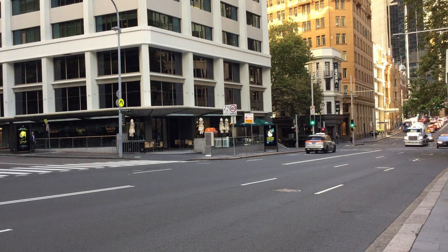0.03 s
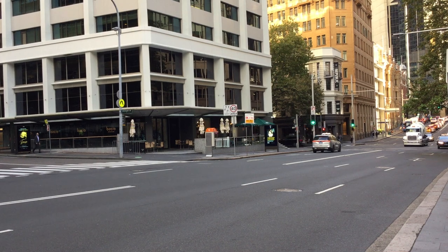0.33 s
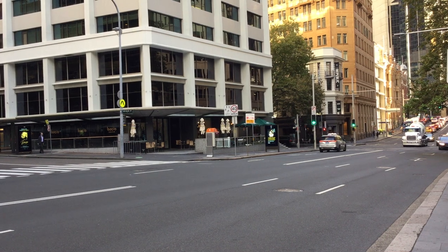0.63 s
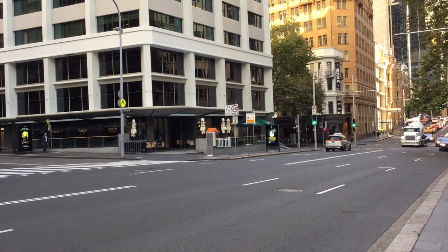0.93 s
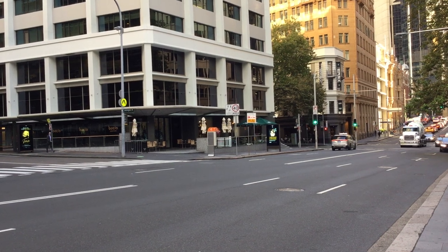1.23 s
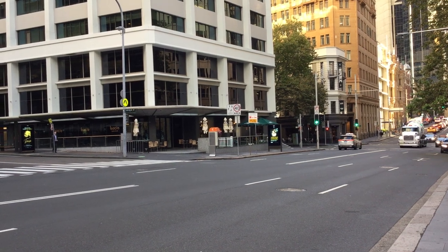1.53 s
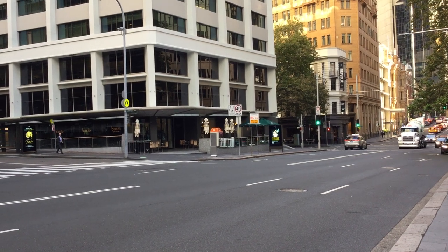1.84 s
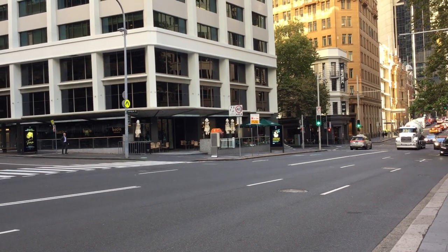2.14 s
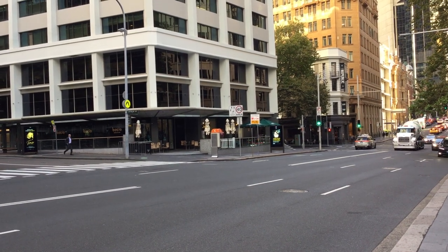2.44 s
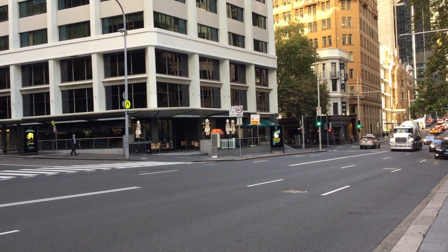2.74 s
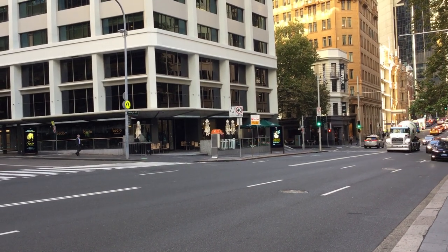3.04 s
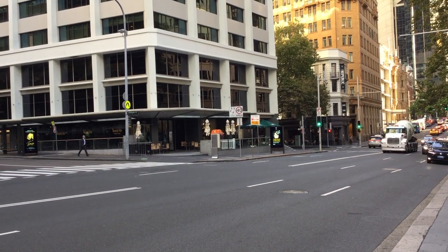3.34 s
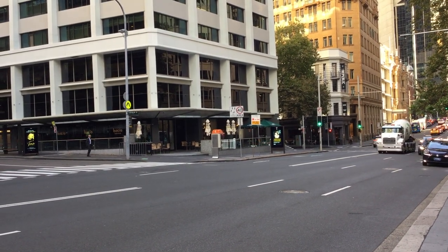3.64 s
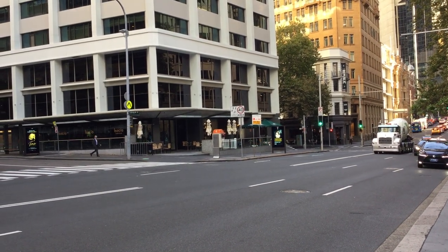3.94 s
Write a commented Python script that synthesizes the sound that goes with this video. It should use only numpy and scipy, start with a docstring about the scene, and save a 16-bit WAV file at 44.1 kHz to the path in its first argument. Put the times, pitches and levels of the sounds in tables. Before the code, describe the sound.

Heard from the roadside between tall buildings, a diesel truck revs, drops in pitch at a gear change, then builds again with brief squeals. One car speeds away and another rolls closer over constant engine rumble and tyre noise.

```python
"""A diesel truck at a city junction

A truck pulls towards a wide junction, changes up a gear and pulls again. Each firing of its
cylinders puffs down the exhaust and rattles the engine, while its turbocharger whistles.
One car speeds away and another rolls closer. Tall buildings echo the truck's exhaust,
blurring it into the steady rumble of far engines and the roar of tyres."""
import sys
import numpy as np
from scipy import signal
from scipy.fft import rfft, irfft
from scipy.io import wavfile

SR = 44100
rng = np.random.default_rng(int(sys.argv[2]) if len(sys.argv) > 2 else 0)


def transcribe(signal):
    """Save signal, clipped to [-1, 1], as a 16-bit WAV file at the path in sys.argv[1]."""
    frames = np.atleast_2d(signal).T
    limited = np.clip(frames, -1, 1)
    pcm = np.round(limited * 32767).astype(np.int16)
    wavfile.write(sys.argv[1], SR, pcm)


N = 176400


def truck():
    """Six slightly unequal cylinders fire in turn and set the beat for every part of the engine."""
    # Engine speed. Each row: time in seconds, firings per second.
    speed = [(0, 99.5), (.45, 99.8), (.8, 101.5), (1.0, 106.5), (1.22, 104.6), (1.5, 103), (1.75, 84),
             (2.2, 86.8), (2.55, 90.9), (3.05, 95.3), (3.5, 100), (3.8, 97.3), (4, 96)]
    # How hard the throttle drives the exhaust. Each row: time in seconds, gain in dB.
    throttle = [(0, -5.5), (.6, -1), (1.1, 1.5), (1.45, 0), (1.7, 2), (2.0, -1), (2.6, -0.5), (3.3, 1.5),
                (4, -3)]
    # How openly the engine bay is heard. Each row: time in seconds, gain in dB.
    openness = [(0, 6), (.6, -4.5), (1.1, -3.5), (1.6, -1), (1.9, 1.5), (2.35, 6), (2.8, 4.5), (3.05, 5.5),
                (3.3, 4.5), (3.5, 7.5), (3.85, 6.5), (4, 0.5)]
    cylinder_spread_db, firing_scatter_db = 2.5, 5.5
    hz = curve(speed) * (1 + 0.0035 * walk(9.1))
    count = np.cumsum(hz) / SR
    firing, phase = count.astype(int), count % 1  # which firing, and how far through it
    cylinders = level(signal.detrend(rng.standard_normal(6), type="constant"), 0)
    scatter = rng.standard_normal(N)[firing]
    strength = undb(cylinder_spread_db * cylinders[firing % 6] + firing_scatter_db * scatter)
    puffs = np.diff(firing, prepend=0) * strength
    load, bay = undb(curve(throttle)), undb(curve(openness))
    pipe = exhaust(puffs, load) + pipe_boom(hz, load)
    return pipe + block_clatter(strength, phase, bay) + injectors(phase, bay) + gears(hz)


def exhaust(puffs, load):
    """The pipe turns the puffs into a deep throb that echoes in the street."""
    # The pipe's tone. Each row: frequency in Hz, gain in dB.
    pipe = [(30, -41), (70, -61), (105, -5), (150, -1), (210, 2.5), (290, 6), (350, -4), (450, -11.5),
            (700, -12), (1500, -60), (4000, -75)]
    return level(street(colour(puffs, pipe) * load), db=-39.5)


def pipe_boom(hz, load):
    """The exhaust pipe booms when the engine's note passes through one of its resonances."""
    # Pipe resonances. Each row: frequency in Hz, width in Hz, gain in dB.
    resonances = [(108, 7, -21), (211.5, 4.1, 3), (292, 38, -4)]
    harmonics = sum(k * tone(k * hz) for k in range(1, 4))
    between = undb(-5) * 3.5 * tone(3.5 * hz)  # uneven cylinders add a tone between harmonics
    waver = undb(2.5 * walk(25))
    return level(ring(harmonics + between, resonances) * load * waver, db=-40.5)


def block_clatter(strength, phase, bay):
    """Each firing knocks the engine block and makes it ring, with a steady rattle in between."""
    # The block's resonances. Each row: frequency in Hz, width in Hz, gain in dB.
    resonances = [(700, 56, 1), (880, 61, 8), (1258, 57, 5.5), (1660, 155, 3.5), (2363, 103, -0.5),
                  (2540, 110, -4), (3650, 170, -6), (4790, 170, -9), (5700, 250, -14), (6670, 230, -16)]
    # Damping of its lows and highs. Each row: frequency in Hz, gain in dB.
    damping = [(300, -10), (600, 3), (7000, -2), (11000, -7.5), (12600, -39), (13200, -65)]
    rattle, decay_firings = 2.1, 0.38
    knocks = (rattle + strength * np.exp(-phase / decay_firings)) * rng.standard_normal(N) * bay
    return level(colour(ring(knocks, resonances), damping), db=-42)


def injectors(phase, bay):
    """The fuel injectors hiss, rising and falling with each firing."""
    # Engine bay resonances. Each row: frequency in Hz, width in Hz, gain in dB.
    resonances = [(3100, 1100, -2), (3960, 380, -6), (4800, 300, 0), (5730, 450, -4), (6640, 330, 1),
                  (7630, 400, -0.5), (10000, 3000, -2)]
    # The tone of the hiss. Each row: frequency in Hz, gain in dB.
    hiss = [(1500, -14), (3000, 19), (5000, 16.5), (7000, 7), (9800, -3), (11500, -10), (12200, -22),
            (12800, -50)]
    throb = 1 + 0.22 * np.cos(2 * np.pi * phase)
    spray = throb * rng.standard_normal(N)
    return level(colour(ring(spray * bay ** 2, resonances), hiss), db=-52.5)


def gears(hz):
    """The timing gears whine as their teeth meet, swelling and fading as the truck pulls."""
    # The whine's loudness. Each row: time in seconds, level in dB.
    whine = [(0, -60), (.45, -50), (.65, -46), (.82, -44.5), (1.0, -51), (1.19, -46), (1.35, -51),
             (1.5, -49), (1.7, -62), (2.9, -62), (3.15, -55), (3.4, -62), (4, -62)]
    teeth_per_firing = 16
    return narrow(teeth_per_firing * hz, width_hz=32) * undb(curve(whine))


def turbo():
    """A thin whistle, with rushing air just below it, climbs with boost and sags at the gear change."""
    # The whistle. Each row: time in seconds, pitch in Hz, level in dB.
    whistle = [(.08, 11540, -66), (.35, 12130, -75), (.7, 12520, -75), (1.03, 13050, -69),
               (1.2, 13110, -67), (1.47, 13010, -71), (1.72, 12390, -72), (1.9, 12260, -69),
               (2.25, 12410, -68), (2.8, 12400, -64), (3.4, 12800, -62), (3.67, 12770, -64),
               (3.83, 12400, -65), (4, 11600, -62)]
    hz = curve(whistle)
    core = narrow(hz, width_hz=75)
    air = undb(1) * narrow(hz - 220, width_hz=480)
    return level(core + air, 0) * undb(curve(whistle, column=2))


def intake():
    """The truck's air intake howls unsteadily as it nears."""
    # The howl. Each row: time in seconds, pitch in Hz, level in dB.
    howl = [(0, 1250, -67), (1.1, 1230, -52), (1.7, 1265, -50), (2.3, 1280, -54), (2.6, 1262, -51),
            (2.85, 1250, -49), (3.05, 1242, -49), (3.3, 1273, -45), (3.58, 1242, -55), (3.77, 1290, -45),
            (3.9, 1255, -54), (4, 1310, -46)]
    hz = curve(howl) * (1 + 0.0079 * walk(40))
    flutter = undb(walk(20))
    return level(tone(hz) * flutter, 0) * undb(curve(howl, column=2))


def squeals():
    """Short, unsteady squeals swell and fade, perhaps from a slipping belt."""
    # Each row is one squeal: time of its peak in seconds, pitch in Hz, peak level in dB.
    peaks = [(1.39, 1227, -44), (1.62, 1262, -49), (1.73, 1262, -42), (1.84, 1320, -43),
             (1.93, 1247, -45.5), (2.09, 1280, -48), (2.89, 1265, -43), (3.2, 1260, -43),
             (3.32, 1287, -41.5), (3.44, 1255, -46), (3.63, 1245, -40), (3.76, 1305, -39),
             (3.86, 1260, -45)]
    length_s = 0.079
    t = np.arange(N) / SR
    waver = 1 + 0.0081 * walk(45)
    return sum(level(tone(hz * waver), db) * np.exp(-(2 * (t - at) / length_s) ** 2)
               for at, hz, db in peaks)


def departing_car():
    """A car's exhaust note rises as it speeds away."""
    # The exhaust note. Each row: time in seconds, pitch in Hz, level in dB.
    path = [(0, 122.3, -65), (1.5, 131.3, -56), (1.8, 137, -38.5), (2.3, 143.2, -42.5), (2.8, 148.5, -44.5),
            (3.4, 155.9, -43), (3.75, 160.1, -35), (4, 161, -49)]
    hz = curve(path) * (1 + 0.0058 * walk(13))
    note = tone(hz) + undb(-5.5) * tone(2 * hz)
    waver = undb(1.75 * walk(8.2))
    return level(note * waver, 0) * undb(curve(path, column=2))


def drone():
    """Another engine booms low for half a second."""
    pitch_hz, start_s, end_s, fade_s = 107.1, 1.05, 1.58, .1
    t = np.arange(N) / SR
    swell = np.clip(np.minimum(t - start_s, end_s - t) / fade_s, 0, 1)
    return level(tone(pitch_hz * (1 + .004 * walk(7))), db=-48.5) * swell


def traffic():
    """Far engines merge into a rumble, and tyres roar on the asphalt."""
    # The tone of the engines, then of the tyres. Each row: frequency in Hz, gain in dB.
    engines = [(20, -53), (45, -44), (62, -37), (85, -20), (120, -9.5), (165, 0), (240, 1.5), (320, 0.5),
               (400, -9), (520, -24), (1000, -21.5), (3000, -65)]
    tyres = [(100, -44), (350, -.5), (500, 0), (690, 3.5), (800, -.5), (1050, -2), (1300, 1), (1500, 0),
             (1750, 1), (2100, 0), (2450, 0.5), (2950, -5), (4000, -8.5), (4450, -11), (5500, -15.5),
             (7000, -20), (9000, -28.5), (11500, -39.5), (12800, -70), (13300, -85)]
    # The rumble's loudness. Each row: time in seconds, level in dB.
    loudness = [(0, -31.5), (1, -32.3), (1.7, -31), (2.7, -31.5), (4, -30.5)]
    rumble = wash(engines, flicker_db=-0.7) * undb(curve(loudness))
    return rumble + wash(tyres, flicker_db=0.45) * undb(-35)


def nearing_car():
    """A car's tyres grow louder as it rolls closer."""
    # The tone of its tyres. Each row: frequency in Hz, gain in dB.
    tyres = [(150, -45), (450, 3.5), (800, 2.5), (1200, 7), (1700, -3.5), (3000, -19), (8000, -50)]
    closest_db, closest_s, closest_m, speed_m_s = -38, 3.76, 12, 7.3
    t = np.arange(N) / SR
    distance_m = np.hypot(closest_m, speed_m_s * (t - closest_s))
    return wash(tyres, flicker_db=0.9) * undb(closest_db) * closest_m / distance_m


def hum():
    """A faint whine hangs in the street."""
    hz = 573.4 * (1 + .003 * walk(9.5))
    return level(tone(hz) * undb(2.5 * walk(2.8)), db=-57)


def street(x):
    """Add the scattered echoes from the building fronts."""
    echo_s, echo_db = 1, -2.5  # echoes fade by 60 dB in echo_s
    t = np.arange(N) / SR
    tail = rng.standard_normal(N) * np.exp(-np.log(1000) * t / echo_s) * np.minimum(t / 0.018, 1)
    return x + undb(echo_db) * signal.fftconvolve(x, tail / np.sqrt(np.sum(tail ** 2)))[:N]


def undb(db):
    """Turn decibels into a multiplier."""
    return 10 ** (np.asarray(db) / 20)


def level(x, db):
    """Scale to an average (rms) level."""
    return x * undb(db) / np.sqrt(np.mean(x ** 2))


def curve(rows, column=1):
    """One column of a timed table, filled in for every sample."""
    rows = np.array(rows, float)
    return np.interp(np.arange(N) / SR, rows[:, 0], rows[:, column])


def colour(x, points):
    """Shape the tone with (Hz, dB) points."""
    hz, db = np.array(points, float).T
    f = np.maximum(np.fft.rfftfreq(N, 1 / SR), 1)
    return irfft(rfft(x) * undb(np.interp(np.log(f), np.log(hz), db)), N)


def ring(x, resonances):
    """Pass through resonances, the pitches at which an object likes to ring."""
    f = np.maximum(np.fft.rfftfreq(N, 1 / SR), 1)
    response = sum(undb(db) / (1 + 1j * (f * f - hz * hz) / (f * width)) for hz, width, db in resonances)
    return irfft(rfft(x) * response, N)


def walk(rate):
    """A smooth random wobble of size 1, moving about `rate` times a second."""
    f = np.fft.rfftfreq(N, 1 / SR)
    return level(irfft(rfft(rng.standard_normal(N)) * np.exp(-(f / rate) ** 2) * (f > 0), N), 0)


def tone(hz):
    """A pure tone that follows a pitch curve."""
    return np.sin(2 * np.pi * np.cumsum(hz) / SR)


def narrow(hz, width_hz):
    """A narrow band of noise around a pitch curve."""
    phase = 2 * np.pi * np.cumsum(hz) / SR
    return level(walk(width_hz) * np.cos(phase) + walk(width_hz) * np.sin(phase), 0)


def wash(points, flicker_db):
    """Shaped noise whose octaves each flicker a little."""
    noise = rfft(colour(rng.standard_normal(N), points))
    octave = np.log2(np.clip(np.fft.rfftfreq(N, 1 / SR), 32, 16384))
    bands = (irfft(noise * np.maximum(1 - abs(octave - k), 0), N) for k in range(5, 15))
    return level(sum(band * undb(flicker_db * walk(4.2)) for band in bands), 0)


def scene():
    """Everything as heard from the kerb."""
    main = truck() + turbo() + intake() + squeals()
    background = departing_car() + drone() + traffic() + nearing_car() + hum()
    return (main + background)[None]


def record(dry):
    """The sound cuts in after a moment of silence; the highest treble is cut off."""
    start_s, top_hz = .0835, 13500
    live = np.arange(N) / SR >= start_s
    return signal.sosfilt(signal.ellip(10, .2, 70, top_hz, fs=SR, output="sos"), dry * live)


dry = scene()
out = record(dry)
transcribe(out)
```